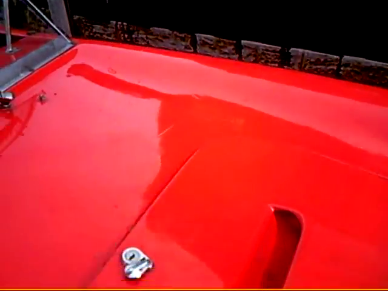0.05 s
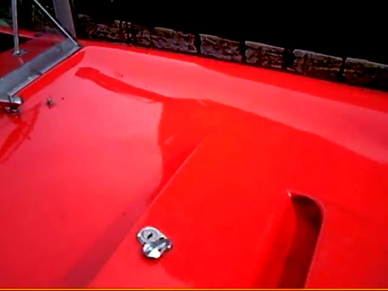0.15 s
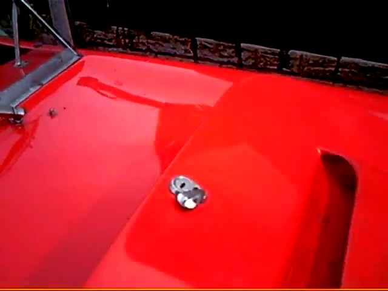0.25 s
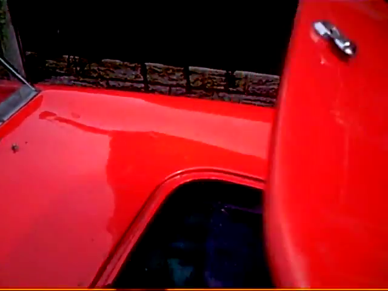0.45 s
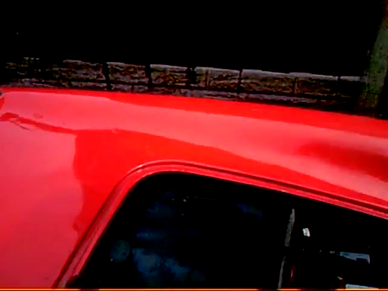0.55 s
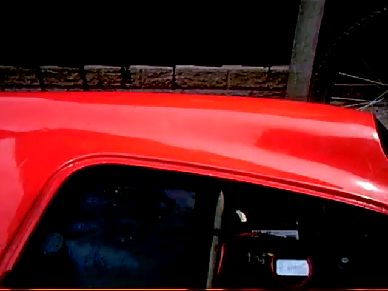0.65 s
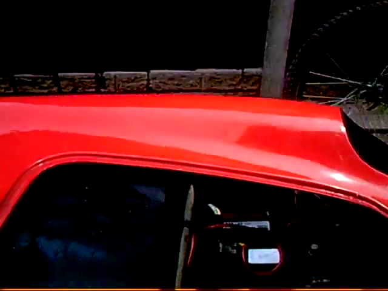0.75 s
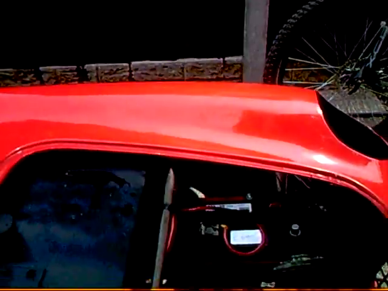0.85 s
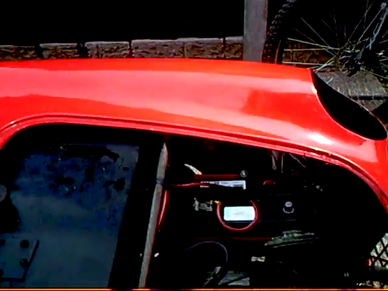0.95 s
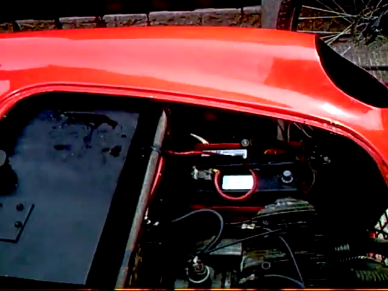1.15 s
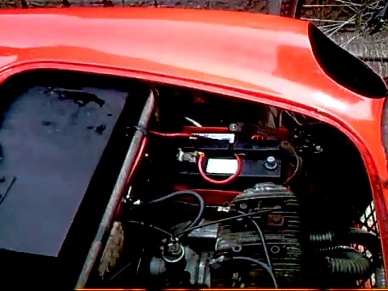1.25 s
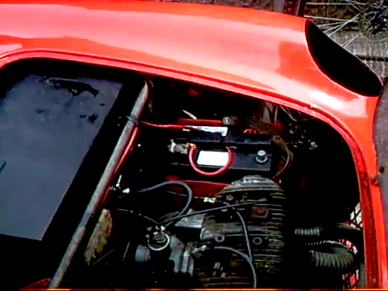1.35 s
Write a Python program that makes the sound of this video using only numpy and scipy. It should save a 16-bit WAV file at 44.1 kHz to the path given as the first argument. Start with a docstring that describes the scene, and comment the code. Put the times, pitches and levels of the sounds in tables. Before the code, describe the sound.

Two sharp clacks of a car bonnet latch, then soft rubbing as it lifts.

```python
"""A quiet yard: a car bonnet is unlatched and lifted close by.
Two clacks, each a quick cluster of contacts, crack, clatter and ring the panel.
The bonnet bumps softly before and after, rubs as it is handled and scrapes faintly as it swings up.
Behind it: the low hum of a distant engine, open-air noise, a small camera's hiss and whine."""
import sys
import numpy as np
from scipy import signal
from scipy.fft import rfft, irfft, next_fast_len
from scipy.io import wavfile

SR = 44100
rng = np.random.default_rng(int(sys.argv[2]) if len(sys.argv) > 2 else 0)


def master_out(mix):
    """Clip the mix to full scale and print it as 16-bit PCM to the path in sys.argv[1]."""
    frames = np.transpose(np.atleast_2d(mix))
    ceiling = np.clip(frames, -1, 1)
    pcm = np.round(ceiling * 32767).astype(np.int16)
    wavfile.write(sys.argv[1], SR, pcm)


N = 61739
T = np.arange(N) / SR
FFT_SIZE = next_fast_len(N, real=True)
FREQS_HZ = np.maximum(np.fft.rfftfreq(FFT_SIZE, 1 / SR), 1)

# Contacts of the two clacks. Each row: start in seconds, ring, clatter and crack gains in dB,
# cut-off in Hz, place from 0 (latch) to 1 (rim).
CONTACTS = [(.23675, -0.25, -2.5, -4.5, 5320, 0.031), (.24147, 2.5, 6, -5.5, 950, 0.082),
            (.24905, 1, -16, -7, 830, 0.077), (0.2598, -9.5, -6, -14, 690, 0.36),
            (0.2684, -10.5, -9, -15, 810, 0.78), (.31677, 3.2, 3, 3.5, 5370, 0.97),
            (0.3211, 2, -1.5, -7, 1890, 0.84), (0.3298, -18.5, -1.5, -16.5, 2040, 0.37),
            (0.351, -18, -26.5, -10.5, 3000, 0.89)]
# Main bonnet modes. Each row: frequency in Hz, T60 in seconds, gain in dB struck at latch, at rim.
PANEL_MODES = [(141.6, 0.21, -47.5, -51), (281.5, 0.26, -50, -50), (332.3, 0.073, -29.5, -31),
               (359.3, 0.2, -58, -37), (442.5, 0.12, -40.5, -46), (576, 0.028, -47.9, -41.5),
               (629, 0.21, -46, -55.5), (740.7, 0.11, -26, -38), (789, 0.012, -17.6, -17.5),
               (862, 0.1, -32, -41.5), (943, 0.026, -23.5, -68), (1133, 0.075, -43.5, -32),
               (1237, 0.096, -35, -30.5), (1464, 0.058, -57, -28), (1571, 0.024, -28.5, -29.5),
               (1886, 0.07, -44.4, -46.5), (1960, 0.074, -45.5, -45.5), (2162, 0.055, -46, -37.5),
               (2432, 0.038, -39, -41), (2685, 0.012, -27, -45)]
# Dense modes and loose fittings. Each row: frequency in Hz, relative density in dB, T60 in seconds.
CLATTER_BANDS = [(98, -15.5, .12), (298, -10, 0.32), (580, -3.5, 0.15), (1040, -1, 0.075),
                 (1600, -11.5, 0.12), (2350, -6, 0.075), (3370, -12.5, 0.049), (3820, -18.5, 0.032),
                 (7900, -35.5, 0.15)]
# Handling bumps. Each row: start in seconds, gain in dB, centre and width in Hz, T60 in seconds,
# roughness from 0 to 1.
BUMPS = [(.019, -42, 146.8, 208, 0.12, 0.77), (0.031, -47, 1000, 870, 0.035, 0.7),
         (0.19, -42, 299, 330, 0.059, 0.84), (0.219, -41.5, 363, 249, 0.085, 0.7),
         (0.253, -36, 105, 90, .07, 0.7), (.687, -39.5, 308, 150, 0.051, 0.34),
         (0.711, -51, 1290, 2000, 0.032, 0.8), (.720, -49.5, 724, 450, 0.086, 0.96)]
# Friction. Each row: time in seconds, rub level in dB, scrape level in dB.
FRICTION_LEVELS = [(0, -61, -78), (.17, -65, -104), (.45, -73.5, -93), (.68, -67.5, -81),
                   (.755, -60.5, -76), (.775, -61, -70), (.84, -58, -67.5), (.92, -61, -71),
                   (1.0, -61, -73), (1.1, -72, -77), (1.4, -93, -99)]
# Panel rub. Each row: frequency in Hz, relative density in dB.
RUB_SPECTRUM = [(150, -3), (330, 4.5), (550, 1.5), (900, 0.5), (1200, -4.5), (1500, 2.5), (1900, -7.5),
                (2600, -11.5), (3700, -20), (5600, -19), (8000, -26.5)]
# Engine hum. Each row: time in seconds, second and third order levels in dB.
ENGINE_LEVELS = [(0, -56, -51.5), (.14, -57, -56.5), (.36, -63.5, -65.5), (.52, -61, -59.5),
                 (.66, -60.5, -55.5), (0.849, -60.5, -55.5), (1.04, -59.5, -68), (1.2, -59.5, -59),
                 (1.4, -62, -58.5)]
# Open air and hiss. Each row: frequency in Hz, relative density in dB.
AIR_SPECTRUM = [(100, -17), (200, -2), (330, -6.5), (600, -6), (900, -4.5), (1200, -1.5), (1450, -4),
                (1800, -12.5), (2400, -15), (3100, -15), (3900, -20.5), (4800, -17.5), (6000, -22),
                (8000, -23)]
# Camera electronics. Each row: frequency in Hz, level in dB.
WHINE_TONES = [(7813, -79.5), (8187, -102.5)]

CLATTER_DB, CLATTER_RISE_S, RING_RISE_S = -37, 0.0012, 0.0008
CRACK_DB, CRACK_HZ, CRACK_WIDTH_HZ, CRACK_RISE_S, CRACK_T60_S = -46.5, 4550, 3300, 0.000067, 0.028
SCRAPE_HZ, SCRAPE_WIDTH_HZ = 4880, 1150
YARD_DB, YARD_T60_S, YARD_DELAY_S = -13, 0.23, 0.028
ENGINE_HZ, ENGINE_WANDER = 32.2, 0.008
AIR_DB, AIR_FLICKER_DB, RUMBLE_DB = -59.5, 0.5, -64.5
TOP_HZ = 8200


def clacks():
    """Each contact gives panel ring, clatter and a metallic crack."""
    out = np.zeros(N)
    for start_s, ring_db, clatter_db, crack_db, cut_hz, place in CONTACTS:
        crack = noise(band(CRACK_HZ, CRACK_WIDTH_HZ)) * strike(start_s, CRACK_RISE_S, CRACK_T60_S)
        out += undb(ring_db) * ring(start_s, cut_hz, place)
        out += undb(clatter_db) * clatter(start_s, cut_hz)
        out += undb(CRACK_DB + crack_db) * crack
    return out


def ring(start_s, cut_hz, place):
    """Main panel modes; the place struck sets their mix."""
    out = np.zeros(N)
    for k, (hz, t60_s, latch_db, rim_db) in enumerate(PANEL_MODES):
        gain = undb(latch_db + place * (rim_db - latch_db)) * softness(hz, cut_hz)
        tone = (-1) ** k * np.sin(2 * np.pi * hz * (T - start_s))
        out += gain * tone * strike(start_s, RING_RISE_S, t60_s)
    return out


def clatter(start_s, cut_hz):
    """Dense modes and loose fittings: noise bands, each with its own decay."""
    centres_hz, _, t60s_s = np.array(CLATTER_BANDS).T
    shape = colour(CLATTER_BANDS)
    out = np.zeros(N)
    for selector, t60_s in zip(np.eye(len(centres_hz)), t60s_s):
        power_share = np.interp(np.log(FREQS_HZ), np.log(centres_hz), selector)
        gain = shape * softness(FREQS_HZ, cut_hz) * np.sqrt(power_share)
        out += noise(gain) * np.linalg.norm(gain) * strike(start_s, CLATTER_RISE_S, t60_s)
    return undb(CLATTER_DB) * out / np.linalg.norm(shape)


def softness(hz, cut_hz):
    """Low-pass gain: a softer contact leaves high modes quiet."""
    return 1 / np.sqrt(1 + (hz / cut_hz) ** 4)


def bumps():
    """Damped handling knocks, from plain thud to loose rattle."""
    out = np.zeros(N)
    for start_s, db, hz, width_hz, t60_s, roughness in BUMPS:
        thud = np.sqrt(2 * (1 - roughness ** 2)) * np.sin(2 * np.pi * hz * (T - start_s))
        rattle = roughness * noise(band(hz, width_hz))
        out += undb(db) * (thud + rattle) * strike(start_s, rise_s=0.0019, t60_s=t60_s)
    return out


def friction():
    """Uneven rub as the bonnet is handled, thin scrape as it rises."""
    times_s, rub_db, scrape_db = np.array(FRICTION_LEVELS).T
    grip = undb(0.52 * drift(rate_hz=37))
    rub = undb(np.interp(T, times_s, rub_db)) * noise(colour(RUB_SPECTRUM))
    scrape = undb(np.interp(T, times_s, scrape_db)) * noise(band(SCRAPE_HZ, SCRAPE_WIDTH_HZ))
    return grip * (rub + scrape)


def yard_echo(source):
    """Weak, dull reflections off nearby walls."""
    echo = noise(band(hz=1250, width_hz=1400)) * strike(YARD_DELAY_S, rise_s=0.0033, t60_s=YARD_T60_S)
    echo /= np.abs(rfft(echo)).max()
    return undb(YARD_DB) * signal.fftconvolve(source, echo)[:N]


def engine():
    """Distant engine: second and third orders beat against each other."""
    times_s, *orders_db = np.array(ENGINE_LEVELS).T
    shaft_hz = ENGINE_HZ * (1 + ENGINE_WANDER * drift(rate_hz=6.3))
    shaft_rad = 2 * np.pi * np.cumsum(shaft_hz) / SR
    return sum(np.sqrt(2) * undb(np.interp(T, times_s, db)) * np.sin(order * shaft_rad)
               for order, db in enumerate(orders_db, 2))


def background():
    """Open-air noise and hiss, low rumble, faint whine of camera electronics."""
    air_db = AIR_DB + AIR_FLICKER_DB * drift(rate_hz=36)
    air = undb(air_db) * noise(colour(AIR_SPECTRUM) * (FREQS_HZ < TOP_HZ))
    rumble = undb(RUMBLE_DB) * noise(band(hz=48, width_hz=90))
    whine = sum(np.sqrt(2) * undb(db) * np.sin(2 * np.pi * hz * T) for hz, db in WHINE_TONES)
    return air + rumble + whine


def undb(db):
    """Decibels to gain."""
    return 10 ** (np.asarray(db) / 20)


def noise(gain):
    """Unit-rms noise shaped by a gain per frequency."""
    shaped = irfft(rfft(rng.standard_normal(FFT_SIZE)) * gain, FFT_SIZE)[:N]
    return shaped / shaped.std()


def colour(points):
    """Gain per frequency from (Hz, dB) points."""
    hz, db = np.array(points).T[:2]
    return undb(np.interp(np.log(FREQS_HZ), np.log(hz), db))


def band(hz, width_hz):
    """Gain of a steep resonance."""
    return 1 / (1 + ((FREQS_HZ ** 2 - hz ** 2) / (FREQS_HZ * width_hz)) ** 2)


def strike(start_s, rise_s, t60_s):
    """Envelope: quick rise, exponential fall."""
    age_s = np.maximum(T - start_s, 0)
    return (1 - np.exp(-age_s / rise_s)) * undb(-60 * age_s / t60_s)


def drift(rate_hz):
    """Slow random drift, unit spread."""
    return noise(np.exp(-(FREQS_HZ / rate_hz) ** 2))


def scene():
    """Bonnet close by in a quiet yard, mono."""
    bonnet = clacks() + bumps()
    return (bonnet + yard_echo(bonnet) + friction() + engine() + background())[None]


def record(dry):
    """The camera cuts the treble steeply."""
    lowpass = signal.ellip(10, 0.2, 70, TOP_HZ, fs=SR, output="sos")
    return signal.sosfilt(lowpass, dry)


dry = scene()
out = record(dry)
master_out(out)
```